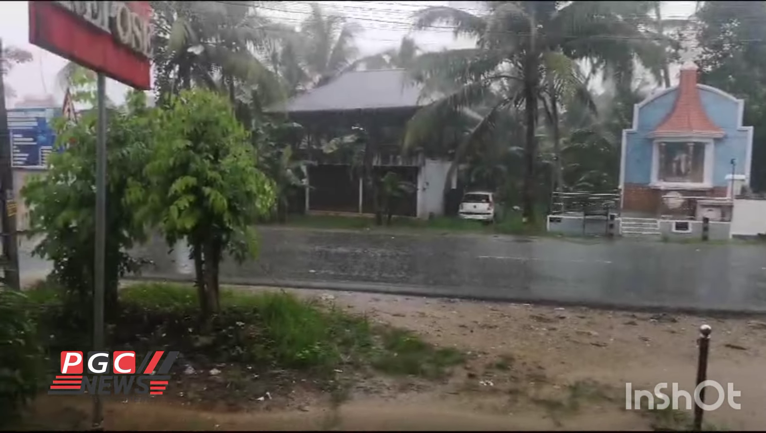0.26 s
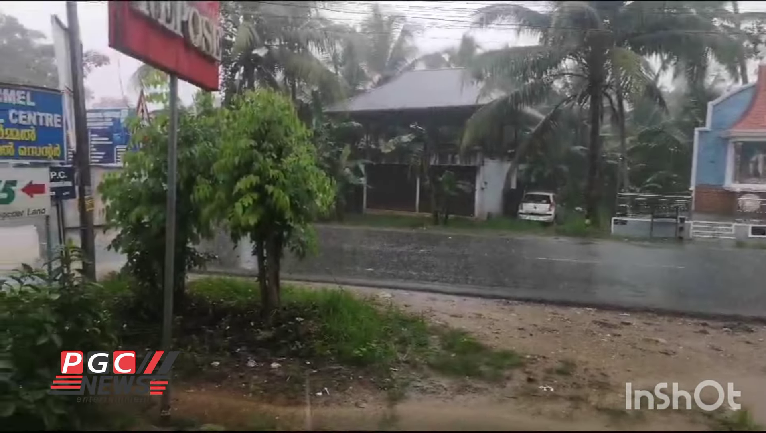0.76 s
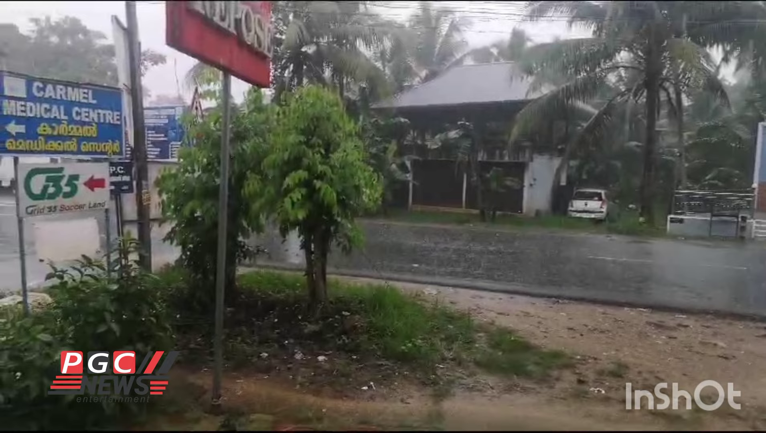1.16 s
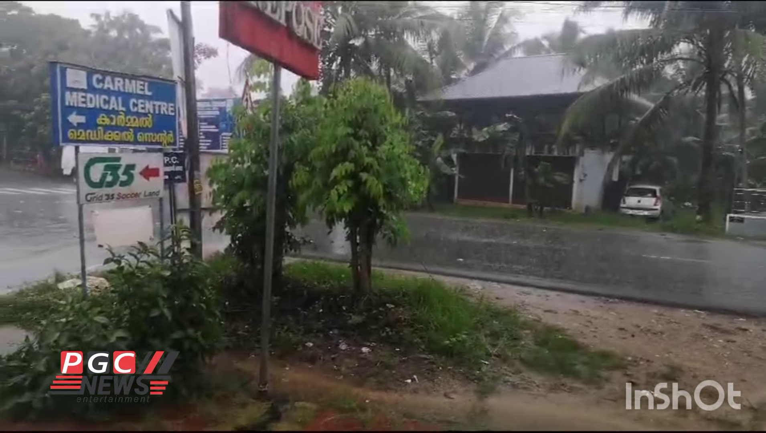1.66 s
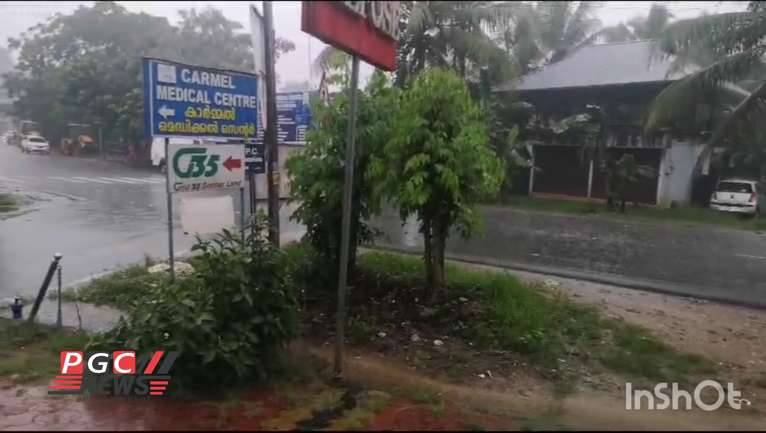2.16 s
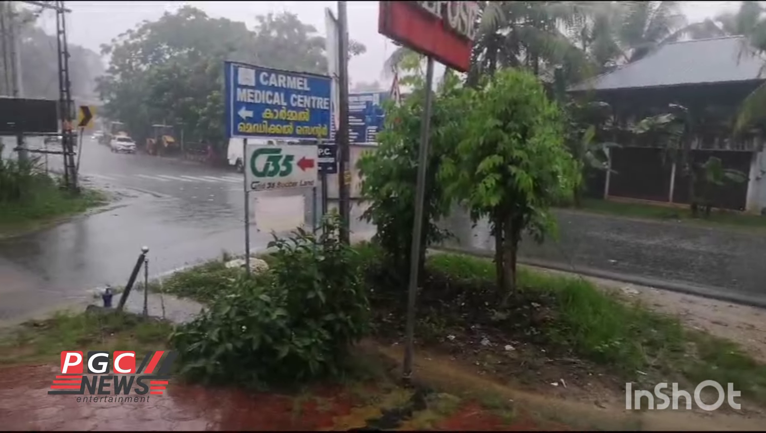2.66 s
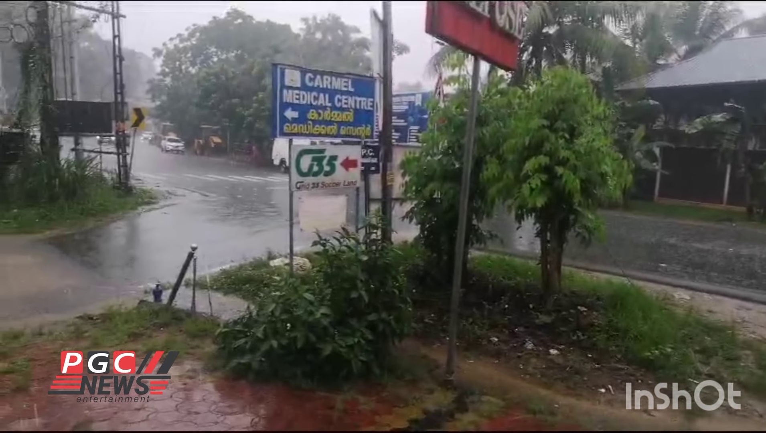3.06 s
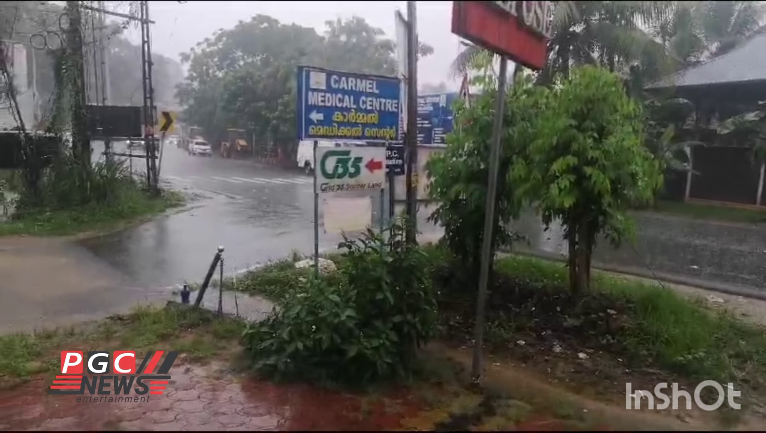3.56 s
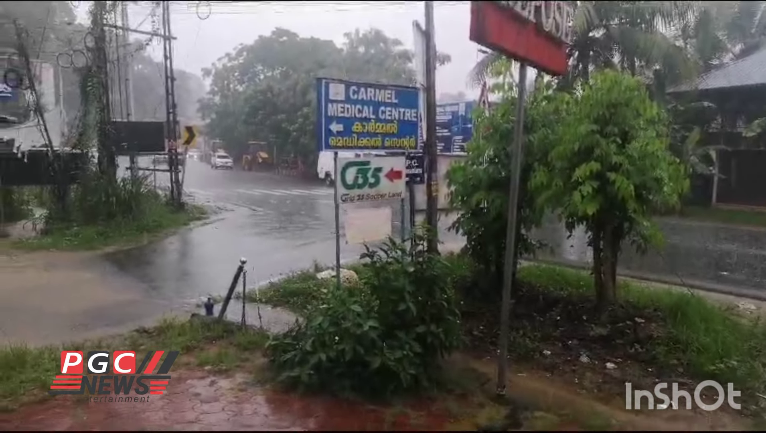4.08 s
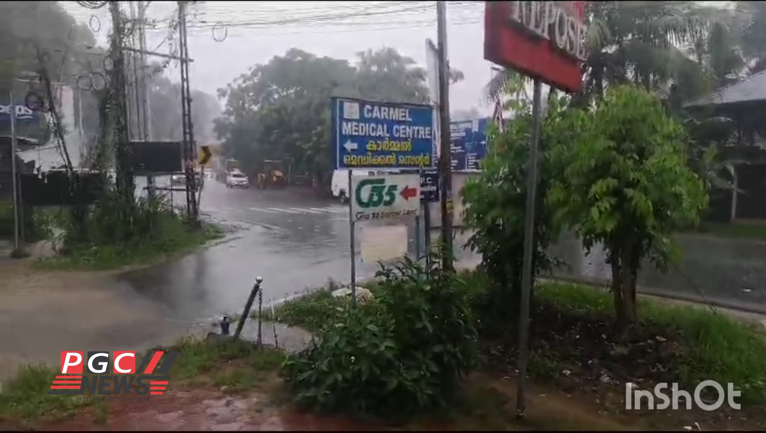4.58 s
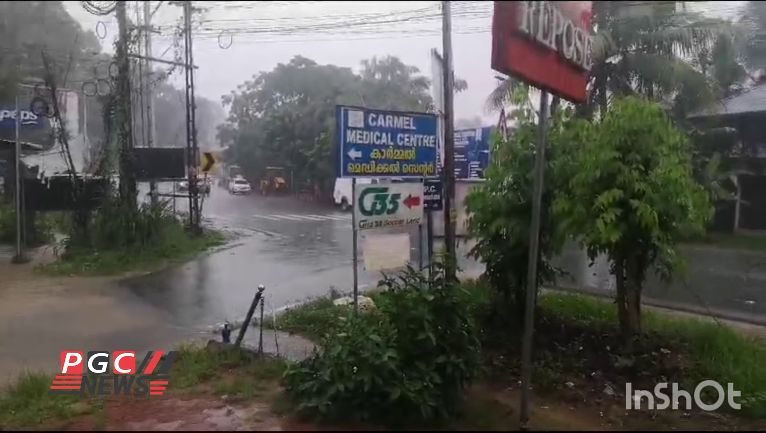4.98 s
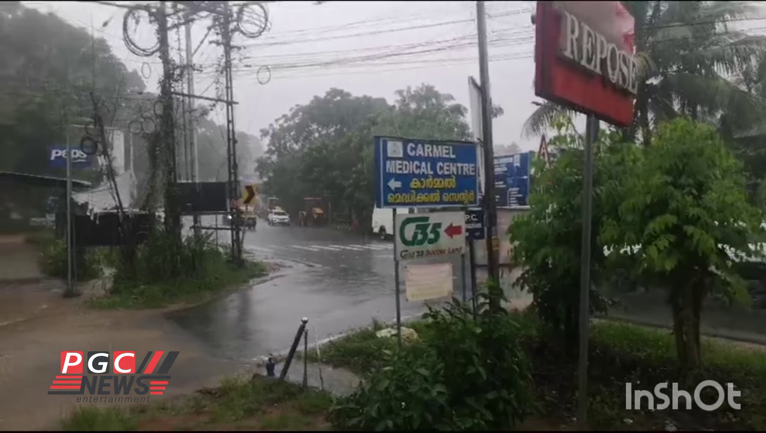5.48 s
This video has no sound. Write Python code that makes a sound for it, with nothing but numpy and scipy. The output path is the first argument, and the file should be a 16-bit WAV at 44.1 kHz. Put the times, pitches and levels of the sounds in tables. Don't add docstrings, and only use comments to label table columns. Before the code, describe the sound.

Heavy rain hisses steadily over a road junction while a car approaches and passes with a rising wash of tyre spray.

```python
import sys
import numpy as np
from scipy import signal
from scipy.fft import rfft, irfft, next_fast_len
from scipy.io import wavfile
from scipy.ndimage import uniform_filter1d

SR = 44100
rng = np.random.default_rng(int(sys.argv[2]) if len(sys.argv) > 2 else 0)


def invert_db(level):
    return 10 ** (np.asarray(level, dtype=float) / 20)


def persist_wave(psi):
    counts = np.round(np.clip(psi, -1, 1) * 32767).astype(np.int16)
    wavfile.write(sys.argv[1], SR, np.atleast_2d(counts).T)


N = 252693

# (pitch [Hz], level per Hz [dB])
RAIN_COLOUR = [(300, -19.5), (520, -7.5), (900, -5), (1200, -2.5), (1450, -4), (1700, 1), (2300, 1),
               (3100, -4.5), (5500, -7.5), (7600, -8), (8300, -14), (9500, -13.5), (10200, -21.5),
               (15000, -26)]
# (time [s], crackle level [dB])
NEAR_RAIN = [(0, -44), (.4, -41), (.8, -54), (1.6, -40), (2.1, -40), (2.6, -37), (3.2, -38.5), (4, -36),
             (5.73, -39)]
# (time [s], level [dB], left minus right [dB], pitch [Hz])
DRIPS = [(0.0352, -26, -1, 6200), (0.0412, -27, -7, 4130), (0.0542, -27, -3, 2760), (0.2687, -19, -1, 5500),
         (0.3006, -28, -5, 5510), (0.3405, -30, 0, 4310), (0.3535, -25, 0, 3960), (0.3655, -25, -1, 6500),
         (0.3695, -22, -2, 4600), (0.6588, -27, -3, 5170), (0.7985, -25, -6, 4650), (0.8204, -29, -1, 7240),
         (0.8793, -28, -2, 7500), (0.9831, -25, -6, 3100), (1.001, -26, -3, 4310), (1.0659, -25, 1, 7580),
         (1.1946, -22, -8, 3450), (1.3153, -25, -5, 2760), (1.5578, -22, -11, 3800),
         (1.6047, -26, -6, 3270), (1.8052, -19, 1, 6000), (1.8077, -29, -15, 6720), (1.8150, -24, -2, 5500),
         (2.2582, -27, -2, 4130), (2.3549, -20.5, -1, 2930), (2.3769, -25, -6, 2930),
         (2.5585, -27, -5, 3450), (2.6253, -25, 0, 4650), (2.769, -26, -6, 5680), (3.1122, -18.5, 1, 3700)]
# (time [s], spray level [dB], facing [1 coming on, 0 side-on, -1 going away])
CAR = [(0, -42.5, 0.84), (.9, -39, 0.4), (2.1, -38.5, 0.53), (2.65, -34.5, 0.14), (2.9, -32, 0.18),
       (3.3, -31.5, 0.97), (3.7, -29, 0.48), (3.95, -28, -0.031), (4.25, -26.5, -0.53), (4.5, -25.5, -0.62),
       (4.8, -25.5, -.7), (5.05, -25.5, -0.76), (5.35, -27, -1.1), (5.73, -30, -1)]
# (pitch [Hz], level per Hz [dB])
SPRAY_COLOUR = [(700, -37), (1300, -13), (1700, 0), (2100, 3), (2450, 6), (3000, 1), (3700, 2), (5200, -4),
                (6400, -2), (7200, -0.5), (7800, -2), (8400, -7), (10300, -17.5), (15000, -29)]
# (start [s], hold [s], level [dB])
GUSTS = [
    (.43, .05, -41),
    (.58, .2, -41),
    (.9, .2, -40),
    (1.37, .12, -39),
    (2.02, .55, -45),
    (3.3, .35, -46),
    (5.05, .6, -45),
]
# (time [s], peak [dB], push or pull [+1 or -1], length [ms])
WIND_BLOWS = [(.598, -15, 1, 3.8), (.645, -32, -1, 4.4), (.657, -23, 1, 5.8), (0.694, -20.5, -1, 6.7),
              (.751, -20, 1, 6.6), (0.881, -24, 1, 6.8), (.89, -17.5, -1, 7.5), (0.915, -19.5, 1, 5.8),
              (.964, -22, 1, 4.8), (1.076, -23.5, -1, 4.2), (1.102, -25, -1, 5.9), (1.115, -31, 1, 7)]
# (pitch [Hz], level per Hz [dB])
WIND_COLOUR = [(7.1, -31), (12, -6), (27, 5), (69, 1.5), (111, -5), (172, -17), (200, -13.5), (260, -44),
               (440, -120)]
# (pitch [Hz], level per Hz [dB])
TRAFFIC_COLOUR = [(35, -3.5), (60, -5.5), (97, -0.5), (124, -3), (233, -4), (265, -5), (424, -12),
                  (600, -15.5), (780, -20), (1320, -120)]
# (pitch [Hz], likeness [-1 to 1])
LIKENESS = [(60, 1), (92, 1), (140, 1), (210, 0.89), (330, 0.77), (500, -0.58), (770, -0.11), (1170, 0.075),
            (1790, -0.11), (2740, -0.015), (4190, 0.012), (6410, -0.0036), (9810, -0.054), (15000, -0.13)]
# (pitch [Hz], left minus right [dB])
PORTS = [(300, -0.5), (700, -1.5), (1500, -1), (2000, -0.5), (2700, -6), (3600, -5), (5000, -1.5),
         (7000, -2), (8500, 4), (9500, 0.5), (11000, -5.5), (12000, -8.5), (13000, -3), (14000, -1)]

SIZE = next_fast_len(N)
HZ = np.arange(1, SIZE // 2 + 2) * SR / SIZE
SIDES = np.array([[.5], [-.5]])
HISS_DB, TRAFFIC_DB = -30.5, -41

RING_HZ, SPIT_PER_OCTAVE_DB = 4000, 8
SPIT_DB, SPIT_SHADE_DB = -20, 2

ROAR_HZ, SWISH_HZ, SIZZLE_HZ = 2000, 4000, 7500
ROAR_DB, SWISH_DB, SIZZLE_DB, PAN_DB = (0, 4), (-.5, 6), (-0.05, 2.5), (-1.2, 1)
GLINT_FACING, GLINT_WIDTH = -.45, .27
GLINT_DB, HOLLOW_DB, SWELL_DB = 3, 4.5, 4

BREEZE_DB, GUST_ATTACK_S, GUST_RELEASE_S = -44.5, 0.024, 0.076
TOP_HZ = 15130


def in_time(rows):
    s, *columns = np.transpose(rows)
    return [np.interp(np.arange(N) / SR, s, column) for column in columns]


def at_hz(points, hz):
    point_hz, value = np.array(points).T
    return np.interp(np.log(hz), np.log(point_hz), value)


def rms_one(x):
    return x / np.sqrt(np.mean(x ** 2) + 1e-20)


def drift(rate):
    r = np.exp(-80 * np.pi * rate / SR)
    chance = rng.standard_normal(N // 40 + 2002)
    slow = signal.lfilter([1], [1, -2 * r, r * r], chance)[2000:]
    return np.interp(np.arange(N) / 40, np.arange(len(slow)), rms_one(slow))


def ring(clicks, hz, cycles):
    r = invert_db(-60 * hz / (cycles * SR))
    w = 2 * np.pi * hz / SR
    strike, fade = [(1 - r * r) / 2, 0, (r * r - 1) / 2], [1, -2 * r * np.cos(w), r * r]
    return signal.lfilter(strike, fade, clicks + 1e-18)


def diffuse(colour, lag=0, direct=0):
    mid, side, ray = rfft(rng.standard_normal((3, SIZE)))
    alike = np.clip(at_hz(LIKENESS, HZ), -1, 1)
    around = np.sqrt((1 + alike) / 2) * mid + np.sqrt((1 - alike) / 2) * side * [[1], [-1]]
    late = ray * np.exp(-2j * np.pi * HZ * lag * SIDES / SR)
    direct = np.clip(direct, 0, 1)
    return invert_db(at_hz(colour, HZ)) * (np.sqrt(1 - direct) * around + np.sqrt(direct) * late)


def patchy(spectra, low_hz, count, band_db):
    out = 0
    scale = np.sqrt(np.mean(irfft(spectra, SIZE) ** 2))
    place = np.clip(2 * np.log2(HZ / low_hz), 0, count - 1)
    for k in range(count):
        share = np.clip(1 - abs(place - k), 0, 1)
        band = irfft(spectra * share, SIZE)[:, :N]
        out = out + band * invert_db(band_db(low_hz * 2 ** (k / 2)))
    return out / scale


def far_rain(hiss_db):
    sheets = 0.5 * drift(9.6) + 1.5 * drift(15.0)

    def swell(hz):
        return np.clip(hz / 5000, .15, 1) * (0.61 * sheets + 0.5 * drift(23))

    noise = diffuse(RAIN_COLOUR, lag=-17, direct=.1)
    return invert_db(hiss_db) * patchy(noise, 350, count=12, band_db=swell)


def crackle(crackle_db, per_s=900, spread_db=4.5, cycles=2.04):
    sizes = invert_db(spread_db * np.minimum(rng.exponential(1, N), 3.6)) * rng.choice([-1, 1], N)
    born = rng.random(N) < per_s * invert_db(5 * drift(8)) / SR
    kind = rng.integers(0, 16, N)
    out = np.zeros((2, N))
    for k, hz in enumerate(np.geomspace(2600, 11500, 16)):
        burst = ring(sizes * born * (kind == k), hz, cycles) * invert_db(at_hz(RAIN_COLOUR, hz))
        pan_db, lag = rng.normal(0, 3), rng.integers(-22, 23)
        out += np.stack([np.roll(burst, lag), burst]) * invert_db(pan_db * SIDES)
    soften = signal.butter(2, 8500, fs=SR, output="sos")
    return invert_db(crackle_db) * rms_one(signal.sosfilt(soften, out))


def energy_one(x):
    return x / np.sqrt(np.sum(x ** 2, axis=1, keepdims=True))


def drips(splat_ms=.6, cycles=11, wide_db=-14):
    out, t = np.zeros((2, N)), np.arange(300) / SR
    noise = rng.standard_normal((len(DRIPS), 3, 300))
    body = signal.butter(3, [2000, 8400], "band", fs=SR, output="sos")
    top = signal.butter(2, 9000, "high", fs=SR, output="sos")
    for (s, level_db, pan_db, hz), grit in zip(DRIPS, noise):
        small_db = SPIT_PER_OCTAVE_DB * np.log2(hz / RING_HZ)
        spit_db = SPIT_DB - SPIT_SHADE_DB * abs(pan_db) + small_db
        splat = (grit[0] + .6 * grit[1:]) * t * np.exp(-t * 1600 / splat_ms)
        first_contact = 2.5 * splat.max() * (np.arange(300) == 8)
        splat = splat + first_contact
        ringing = ring(splat, hz, cycles * RING_HZ / hz)
        drop = energy_one(signal.sosfilt(body, invert_db(wide_db + small_db) * splat + ringing))
        spit = invert_db(spit_db + 4) * energy_one(signal.sosfilt(top, splat))
        at = round(s * SR)
        out[:, at:at + 300] += (drop + spit) * invert_db(level_db + 16 + pan_db * SIDES)
    return out


def spray():
    level_db, facing = in_time(CAR)
    turning = (ROAR_DB, SWISH_DB, SIZZLE_DB, PAN_DB)
    roar_db, swish_db, sizzle_db, pan_db = (side_db + turn_db * facing for side_db, turn_db in turning)
    glint = np.exp(-((facing - GLINT_FACING) / GLINT_WIDTH) ** 2)
    roar_db = roar_db + SWELL_DB * glint
    swish_db = swish_db - HOLLOW_DB * glint
    sizzle_db = sizzle_db + GLINT_DB * glint
    surge = 0.22 * drift(24.0)

    def near(hz, centre_hz):
        return np.exp(-(np.log2(hz / centre_hz) / .35) ** 2)

    def bands(hz):
        shift_db = roar_db * near(hz, ROAR_HZ) + swish_db * near(hz, SWISH_HZ)
        shift_db = shift_db + sizzle_db * near(hz, SIZZLE_HZ)
        return shift_db + surge + 0.75 * drift(13)

    noise = diffuse(SPRAY_COLOUR, lag=18.06, direct=0.21)
    return invert_db(level_db + pan_db * SIDES) * patchy(noise, 1020, count=9, band_db=bands)


def gusts():
    t, power = np.arange(N) / SR, invert_db(2 * BREEZE_DB)
    for s, hold_s, level_db in GUSTS:
        rise = (t - s) / GUST_ATTACK_S
        fall = 1 + (s + GUST_ATTACK_S + hold_s - t) / GUST_RELEASE_S
        shape = np.clip(np.minimum(rise, fall), 0, 1)
        power = power + (invert_db(level_db) * shape) ** 2
    return 10 * np.log10(power)


def wind(wind_db):
    shared, own = rfft(rng.standard_normal(SIZE)), rfft(rng.standard_normal((2, SIZE)))
    own_db = -19.5 + 13.2 * np.exp(-(np.log2(HZ / 80) / 1.2) ** 2)
    spectra = invert_db(at_hz(WIND_COLOUR, HZ)) * (shared + invert_db(own_db) * own)
    eddies = irfft(spectra, SIZE)[:, :N]
    lumps = invert_db(wind_db + 0.65 * drift(9.3)) * rms_one(eddies)
    blows, t = np.zeros(N), np.arange(N) / SR
    for s, peak_db, sign, ms in WIND_BLOWS:
        blows += np.sign(sign) * invert_db(peak_db + 1.8) * np.exp(-((t - s) * 1600 / ms) ** 2)
    leak = signal.butter(1, 22, "high", fs=SR, output="sos")
    return lumps + signal.sosfilt(leak, blows)


def traffic(traffic_db):
    def unevenness(hz):
        return 1.8 * drift(1.8)

    return invert_db(traffic_db) * patchy(diffuse(TRAFFIC_COLOUR), 58.0, count=7, band_db=unevenness)


def thin_top(x, from_hz=9300, rarity=.65):
    hz, frames, cells = signal.stft(x, SR, nperseg=2048)
    chance = rng.standard_normal(cells.shape[1:])
    chance = uniform_filter1d(chance, size=6, axis=0)
    chance = uniform_filter1d(chance, size=3, axis=1)
    kept = (rms_one(chance) < rarity) | (hz[:, None] < from_hz)
    dips = np.repeat(rng.geometric(.5, len(frames)) - 1, 2)[:len(frames)]
    ceiling = TOP_HZ - 220 * dips
    return signal.istft(cells * kept * (hz[:, None] < ceiling), SR, nperseg=2048)[1][:, :N]


def scene():
    crackle_db, = in_time(NEAR_RAIN)
    field = far_rain(HISS_DB) + crackle(crackle_db) + spray() + traffic(TRAFFIC_DB)
    port_gain = invert_db(at_hz(PORTS, HZ) * SIDES)
    coloured = irfft(rfft(field, SIZE) * port_gain, SIZE)[:, :N]
    return coloured + drips() + wind(gusts())


def roll_off(x):
    return signal.sosfilt(signal.butter(12, 15780, fs=SR, output="sos"), x)


def record(dry):
    mix = thin_top(dry)
    return roll_off(mix)


dry = scene()
out = record(dry)
persist_wave(out)
```